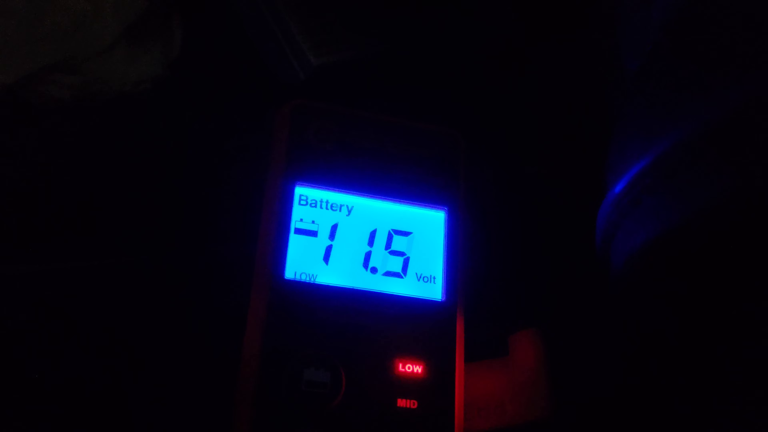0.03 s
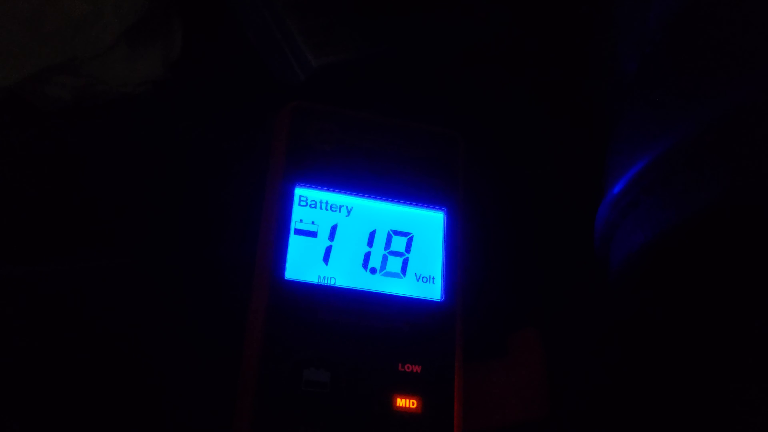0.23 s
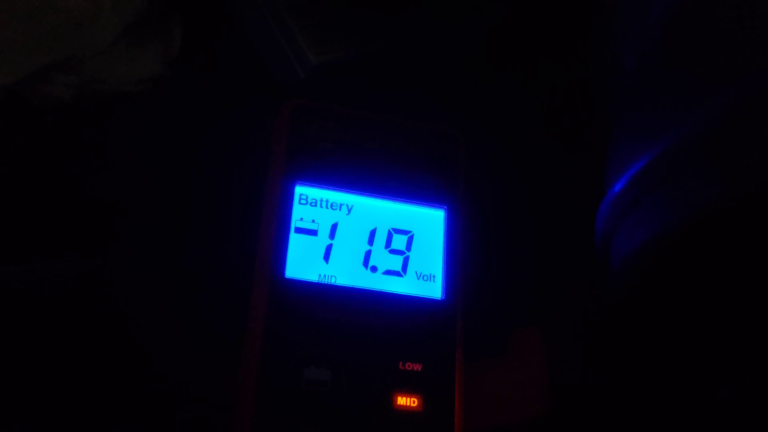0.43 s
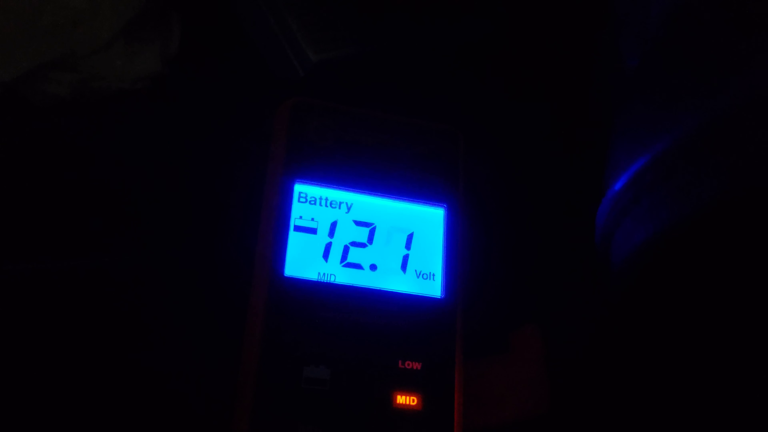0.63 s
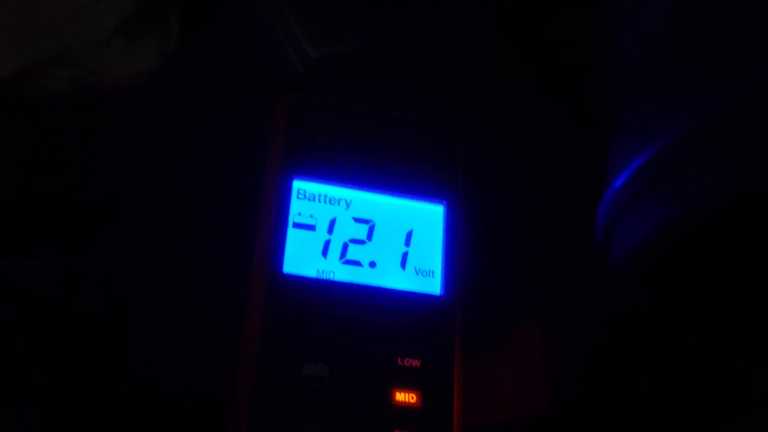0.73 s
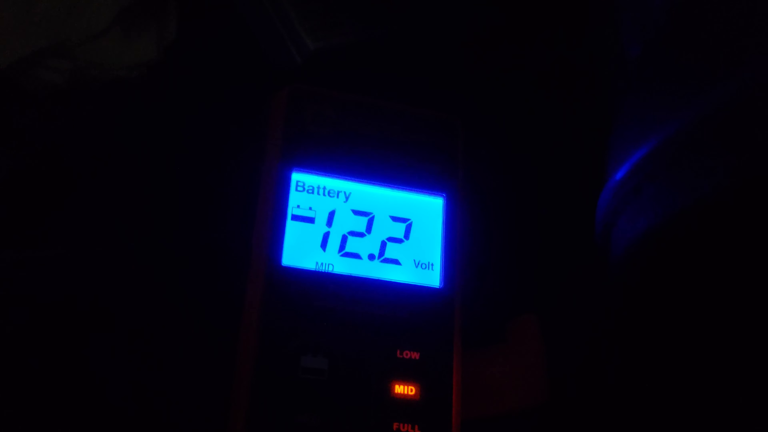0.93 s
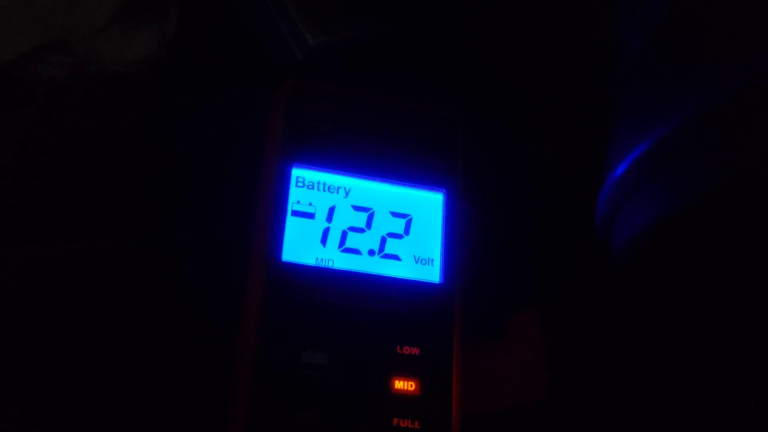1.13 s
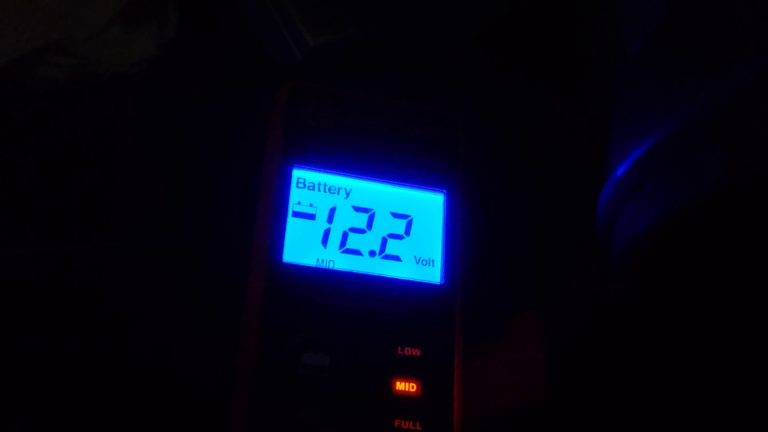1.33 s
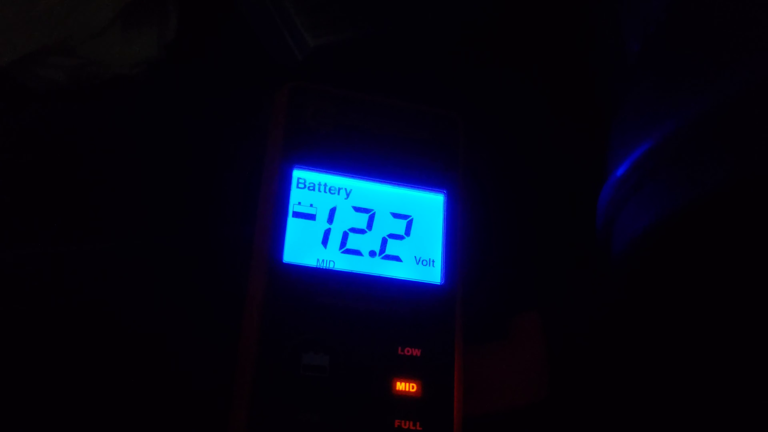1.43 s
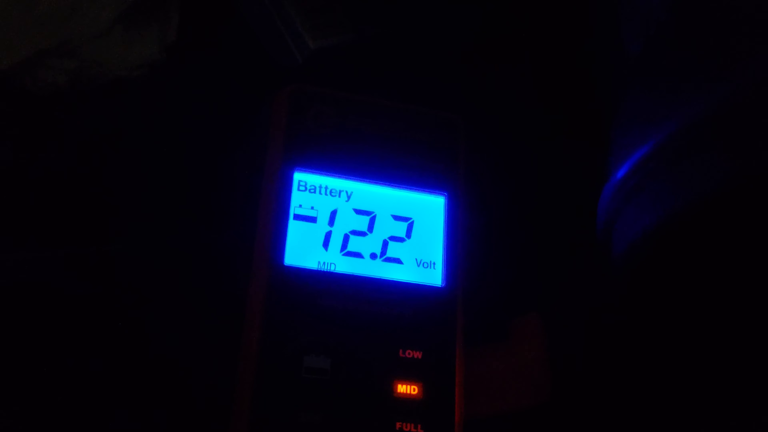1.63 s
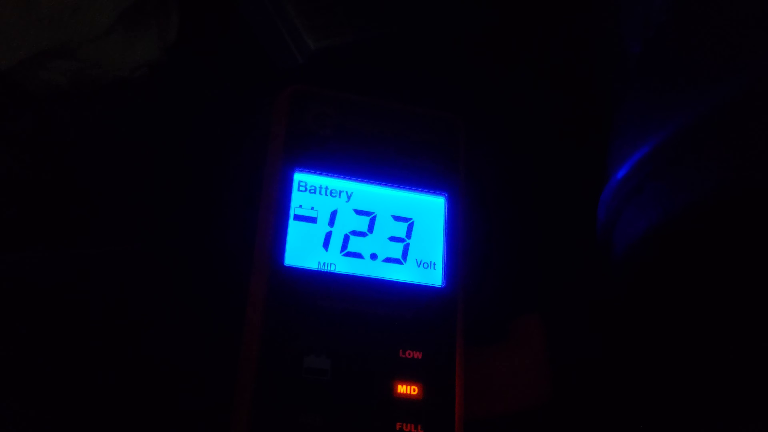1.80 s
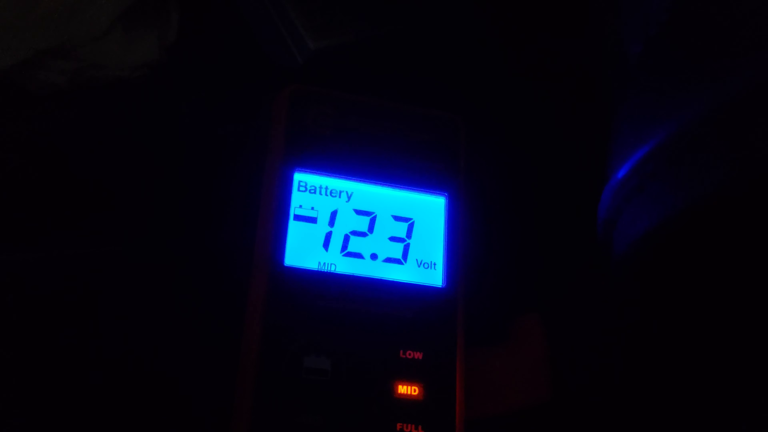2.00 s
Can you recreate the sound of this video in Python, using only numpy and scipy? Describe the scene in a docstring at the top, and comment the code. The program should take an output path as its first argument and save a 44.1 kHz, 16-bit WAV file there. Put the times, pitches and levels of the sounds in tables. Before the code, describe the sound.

A car engine idles with a low rumble, and one sharp plastic click sounds close by.

```python
"""Idle settling, inside the car

A just-started engine eases from a fast idle to a slow one, heard in the closed cabin. Its firing note
booms over a throbbing rumble, a hum and a rush of air. Close by, a plastic part snaps once, knocks in
its panel and rebounds; a soft cloth rustle, probably a sleeve, and a few faint ticks follow."""
import sys
import numpy as np
from scipy import signal
from scipy.fft import rfft, irfft
from scipy.io import wavfile

SR = 44100
rng = np.random.default_rng(int(sys.argv[2]) if len(sys.argv) > 2 else 0)


def dump_mix(stems):
    """Bounce the given channels to the path in sys.argv[1] as a 16-bit WAV at rate SR."""
    frames = np.atleast_2d(stems).T  # one column per channel
    limited = np.clip(frames, -1, 1)  # hard clip at full scale
    pcm = np.round(limited * 32767).astype(np.int16)
    wavfile.write(sys.argv[1], SR, pcm)


N = 90801
TIME, FREQ = np.arange(N) / SR, np.fft.rfftfreq(N, 1 / SR)

# engine speed (time [s], firing rate [Hz])
FIRING_RATE = [(.15, 49.5), (.3, 48), (.5, 46.3), (.8, 44.5), (1.02, 40.4), (1.2, 40.3), (1.42, 37),
               (1.68, 36.9), (1.8, 35.5), (2.06, 34)]
# boom of the firing note (time [s], level [dB])
BOOM_LEVEL = [(0, -38), (.28, -41), (.43, -37), (.61, -34.5), (.73, -41.5), (.8, -37), (.85, -50),
              (.9, -41), (1.03, -49), (1.1, -42.5), (1.19, -63), (1.24, -46.5), (1.34, -43), (1.39, -48.5),
              (1.45, -37.5), (1.72, -36.5), (1.91, -41.5), (2.06, -51)]
# its overtones (multiple [x firing rate], level before body and cabin EQ [dB])
OVERTONES = [(1.5, -57), (2, -55), (3, -55), (4, -53), (5, -55), (7, -62), (9, -57.5), (12, -54.5)]
# tone of block and body (frequency [Hz], gain [dB])
BODY_EQ = [(15, -35), (28, -10), (42, 2.5), (65, -0.5), (110, -4), (160, -9), (220, -9.5), (340, -8),
           (430, -18), (600, -24), (800, -32), (1100, -44), (5000, -60.5)]
# cabin resonances (frequency [Hz], width [Hz], boost [dB])
CABIN_PEAKS = [(175.7, 6, 8), (210.8, 14, 6.5), (321.7, 9.2, 3), (594.4, 50, 2.5)]
# rumble envelope (time [s], level [dB])
RUMBLE_LEVEL = [(0, -43.5), (.45, -46.5), (.8, -44), (1.2, -48), (2.06, -49)]
# stereo image of the rumble (frequency [Hz], left-right correlation [-1 to 1])
RUMBLE_IMAGE = [(130, 0.65), (290, 0.96), (640, -0.13), (1400, -1), (3000, 0.5)]
# engine pan (frequency [Hz], left minus right [dB])
ENGINE_PAN = [(100, 1.3), (200, 0.5), (380, -3.5), (1300, 1), (2400, -3)]
# hum envelope (time [s], level [dB])
HUM_LEVEL = [(0, -50.5), (.33, -54.5), (.55, -57.5), (.95, -61), (1.16, -47.5), (1.36, -66), (1.48, -54),
             (1.66, -50), (1.82, -52.5), (1.95, -62.5)]
# tone of fan and intake air (frequency [Hz], gain [dB])
AIR_EQ = [(300, -3), (600, 4.5), (900, -4.5), (1200, -6.5), (1650, -5), (2300, -15), (3500, -25),
          (8000, -49.5)]
# air envelope (time [s], level [dB])
AIR_LEVEL = [(0, -55), (.25, -64), (.75, -62), (1.05, -66.5), (1.4, -75), (2.06, -76)]

# the snap and its rebounds (time [s], level before EQ [dB], length [s])
CRACKS = [(0.0865, -7.5, 0.0028), (0.09, -19.5, 0.0042), (0.112, -34.5, 0.0029), (0.1253, -38.5, 0.0098)]
# tone of the cracks (frequency [Hz], gain [dB])
CRACK_EQ = [(100, -8.5), (300, -1), (760, -0.5), (970, -8), (1650, -1.5), (2500, -2), (3600, 1.5),
            (5200, -1), (7300, 3), (9500, 2), (12000, 0), (15500, 6)]
# resonances of the plastic part (frequency [Hz], width [Hz], boost [dB])
PLASTIC_PEAKS = [(2017, 100, 7.5), (3120, 70, 3.5), (3460, 80.4, 4), (3874, 160, 9), (4520, 200, 6.5),
                 (7500, 1400, 7), (11650, 500, 6.5)]
# cabin reverb decay (frequency [Hz], T60 [s])
CABIN_T60 = [(150, 0.048), (450, 0.12), (1000, 0.054), (3500, 0.059), (8000, 0.043), (15000, 0.05)]
# the part's low knock in its panel (frequency [Hz], level [dB], T60 [s])
KNOCK_MODES = [(436.2, -19.5, .055), (608, -25, 0.035), (805, -23.5, 0.023), (1092, -30, 0.04)]
# the panel's deep thump (frequency [Hz], level [dB], T60 [s])
THUMP_MODES = [(125, -28.5, 0.13), (266, -31.5, 0.1)]
# faint metallic ring of the rebound (frequency [Hz], level [dB], T60 [s])
REBOUND_MODES = [(2820, -41, .035), (3030, -39, 0.064), (4800, -35.5, 0.033)]

# rustle envelope (time [s], level [dB])
RUSTLE_LEVEL = [(.04, -76.5), (.07, -46), (.16, -61), (.27, -64.5), (.33, -57.8), (.54, -54.3),
                (.63, -56.5), (.69, -52.5), (.79, -53.3), (.855, -66), (.97, -65.5), (1.03, -60),
                (1.13, -57), (1.22, -62), (1.32, -65), (1.41, -62.5), (1.52, -68), (1.72, -76.5),
                (2.06, -87)]
# tone of the cloth (frequency [Hz], gain [dB])
RUSTLE_EQ = [(400, 0.5), (1000, -3), (2600, -2.5), (4000, -2), (7000, 2.5), (12000, -1), (16000, 0)]
# rasp while the cloth presses hardest (time [s], level [dB])
RASP_LEVEL = [(.27, -82), (.34, -62.5), (.54, -58.5), (.65, -64), (.76, -62), (.85, -83)]
# resonances of the rasp (frequency [Hz], width [Hz], boost [dB])
RASP_PEAKS = [(1740, 780, 5), (2650, 170, 7.5)]
# handling ticks (time [s], level before EQ [dB], centre [Hz], half-width [octaves], decay [s])
TICKS = [(0.8722, -37, 14000, 0.71, 0.00026), (.9972, -50.5, 5000, 2.5, 0.004),
         (1.5406, -43.5, 9700, 0.18, 0.0053)]
# tone of the left microphone port (frequency [Hz], gain [dB])
LEFT_EQ = [(1000, -2), (4000, 2.5), (5500, 1.5), (7200, 3.5), (8300, -4.5), (9500, -3), (11500, 4),
           (15500, 1.5)]
# tone of the right microphone port (frequency [Hz], gain [dB])
RIGHT_EQ = [(1000, 0.5), (3800, -2.5), (5200, -12), (8000, -21), (9500, -7), (11700, 3.5), (13000, -1.5),
            (15500, -3)]


def engine():
    """The slowing idle: firing note, hum, rumble and air, panned by frequency."""
    rate = curve(FIRING_RATE)
    firings = np.cumsum(rate) / SR
    tones = np.sqrt(2) * (hum(firings) + firing_note(rate, firings))  # tone levels are rms
    mix = tones + rumble(firings) + air_rush()
    pan = amp(np.outer([.5, -.5], by_freq(ENGINE_PAN)))
    return irfft(rfft(mix) * pan, N)


def firing_note(rate, firings, waver_db=2.5, waver_hz=6.5, jitter_cycles=0.017):
    """The firings boom; their wavering overtones swell as they slide through the cabin resonances."""
    note = amp(curve(BOOM_LEVEL)) * np.sin(2 * np.pi * firings)
    for multiple, db in OVERTONES:
        hz = multiple * rate
        body_db = by_freq(BODY_EQ, hz) + peaks_db(CABIN_PEAKS, hz)
        phase = multiple * (firings + jitter_cycles * drift(waver_hz)) + rng.random()
        note += amp(db + body_db + waver_db * drift(waver_hz)) * np.cos(2 * np.pi * phase)
    return note


def rumble(firings, throb_depth=0.31):
    """Low noise of block and body, throbbing at each firing."""
    throb = 1 + throb_depth * np.cos(2 * np.pi * firings)
    left, spread = rng.standard_normal((2, N)) * throb
    shared = np.clip(by_freq(RUMBLE_IMAGE), -1, 1)
    right = irfft(shared * rfft(left) + np.sqrt(1 - shared ** 2) * rfft(spread), N)
    body_db = by_freq(BODY_EQ) + peaks_db(CABIN_PEAKS)
    return shaped(np.array([left, right]), body_db, RUMBLE_LEVEL)


def hum(firings, multiple=5.87, waver_db=1.65):
    """A fluttering hum that tracks engine speed, probably a belt-driven part."""
    level_db = curve(HUM_LEVEL) + waver_db * drift(hz=17)
    return amp(level_db) * np.cos(2 * np.pi * multiple * firings)


def air_rush():
    """Fan and intake air: a midrange wash that fades back."""
    return shaped(rng.standard_normal((2, N)), by_freq(AIR_EQ), AIR_LEVEL)


def plastic_snap(slip_db=-22.5, slip_s=0.0017):
    """The part slips, cracks and rebounds, ringing the plastic and knocking its panel."""
    start = CRACKS[0][0]
    slip = amp(slip_db) * np.exp(-abs(TIME - start) / slip_s) * (TIME < start)
    pulses = sum(amp(db) * np.sin(np.pi * np.clip((TIME - at) / length, 0, 1))
                 for at, db, length in CRACKS)
    cracks = (slip + pulses) * rng.standard_normal((2, N))
    plastic = eq(cracks + cabin_reverb(cracks), by_freq(CRACK_EQ) + peaks_db(PLASTIC_PEAKS))
    knock = struck(KNOCK_MODES, start, rise_s=0.0036)
    thump = struck(THUMP_MODES, start=.102, rise_s=.004)
    ring = struck(REBOUND_MODES, start=.1275, rise_s=0.00073)
    return plastic + knock + thump + ring


def cabin_reverb(x, wet_db=-6, rise_s=0.0024):
    """Sound scatters through the small, dead cabin in a short, dense tail."""
    t = TIME[:SR // 4]
    hz, age, bands = signal.stft(rng.standard_normal((2, len(t))), SR, nperseg=128)
    bands *= np.exp(-np.log(1000) * age / by_freq(CABIN_T60, hz)[:, None])
    tail = signal.istft(bands, SR)[1][:, :len(t)] * (1 - np.exp(-t / rise_s))
    impulse = amp(wet_db) * unit(tail) / np.sqrt(len(t))
    return signal.fftconvolve(x, impulse, axes=1)[:, :N]


def cloth_rustle(grain_db=0.5):
    """Cloth friction: a fine, grainy brush, with a lower rasp where it presses hardest."""
    grains = rng.standard_normal((2, 2, N)) * amp(grain_db * drift(hz=500))
    brush = shaped(grains[0], by_freq(RUSTLE_EQ), RUSTLE_LEVEL)
    rasp = shaped(grains[1], band_db(hz=1920, octaves=1) + peaks_db(RASP_PEAKS), RASP_LEVEL)
    pressing = (TIME > RASP_LEVEL[0][0]) * (TIME < RASP_LEVEL[-1][0])
    return brush + rasp * pressing


def handling_ticks(tail_db=-20.5, tail_s=0.019):
    """Tiny clicks and scuffs, each a tight noise burst in its own band with a faint cabin tail."""
    out = np.zeros((2, N))
    for at, db, hz, octaves, decay in TICKS:
        t = abs(TIME - at)
        envelope = (TIME >= at) * (np.exp(-t / decay) + amp(tail_db) * np.exp(-t / tail_s))
        out += eq(rng.standard_normal((2, N)) * envelope, db + band_db(hz, octaves, order=2))
    return out


def hiss(gain_db=-76):
    """A faint, steady bed of top-end noise."""
    return eq(rng.standard_normal((2, N)), gain_db + band_db(hz=15000, octaves=1, order=2))


def struck(modes, start, rise_s):
    """Struck modes swell in from the start time and ring out."""
    t = np.maximum(TIME - start, 0)
    ring = sum(amp(db) * np.exp(-np.log(1000) * t / t60) * np.sin(2 * np.pi * hz * t)
               for hz, db, t60 in modes)
    return (1 - np.exp(-t / rise_s)) * ring


def shaped(noise, eq_db, envelope):
    """EQs and normalises noise, then rides its level."""
    return unit(eq(noise, eq_db)) * amp(curve(envelope))


def eq(x, db):
    """Minimum-phase EQ with the given gain at each frequency."""
    cepstrum = irfft(np.log(amp(db)), N)
    cepstrum[..., 1:] *= 2 * (np.arange(1, N) < N / 2)
    return irfft(rfft(x) * np.exp(rfft(cepstrum)), N)


def band_db(hz, octaves, order=4):
    """Band-pass curve, 3 dB down at the given octaves either side."""
    return -10 * np.log10(1 + (np.log2((FREQ + 1) / hz) / octaves) ** order)


def peaks_db(peaks, hz=FREQ):
    """EQ curve of a set of resonances."""
    return sum(db / (1 + (2 * (hz - centre) / width) ** 2) for centre, width, db in peaks)


def drift(hz):
    """Random modulation of rms 1, rolling off around the given rate."""
    return unit(irfft(rfft(rng.standard_normal(N)) * np.exp(-(FREQ / hz) ** 2), N))


def curve(points):
    """Reads a time table at every sample."""
    return np.interp(TIME, *np.transpose(points))


def by_freq(points, hz=FREQ):
    """Reads a frequency table on a log axis."""
    knots, values = np.transpose(points)
    return np.interp(np.log(hz + 1), np.log(knots + 1), values)


def amp(db):
    """Decibels to gain."""
    return 10 ** (np.asarray(db) / 20)


def unit(x):
    """Scales to rms 1."""
    return x / np.sqrt(np.mean(x ** 2) + 1e-20)


def scene():
    """The engine, plus the close sounds and hiss coloured by the two microphone ports."""
    idle = engine()
    close = cloth_rustle() + hiss() + plastic_snap() + handling_ticks()
    ports_db = np.array([by_freq(LEFT_EQ), by_freq(RIGHT_EQ)])
    return idle + eq(close, ports_db)


def record(dry):
    """Soft-clips the highest peaks and cuts the top above 16 kHz."""
    ceiling = .75
    soft = ceiling * np.tanh(dry / ceiling)
    lowpass = signal.firwin(401, 16000, window=("kaiser", 9), fs=SR)
    return signal.oaconvolve(soft, lowpass[None], "same")


dry = scene()
out = record(dry)
dump_mix(out)
```